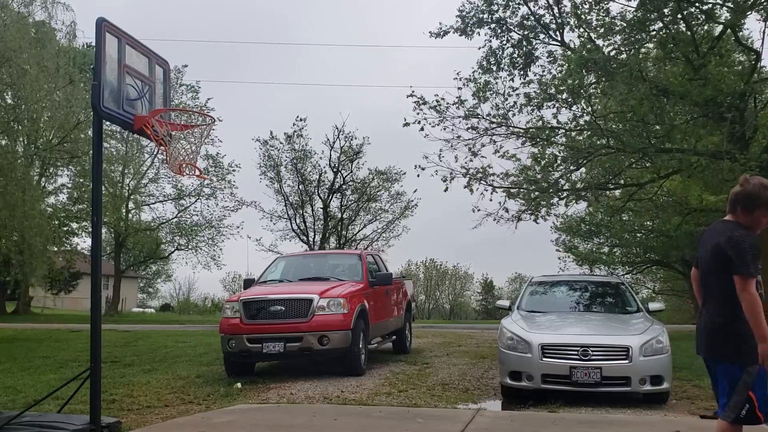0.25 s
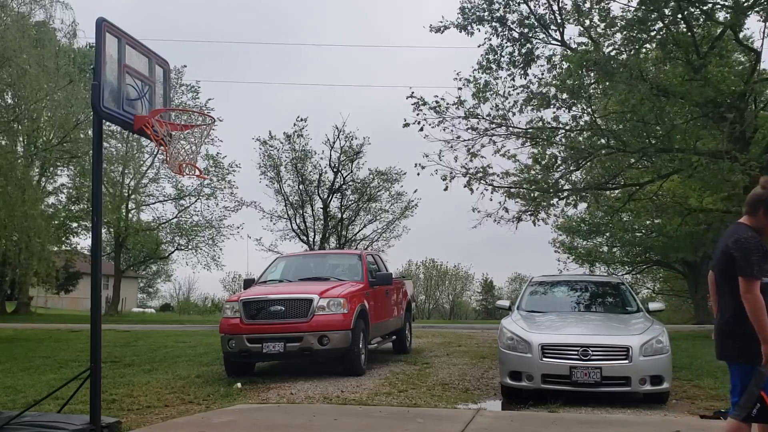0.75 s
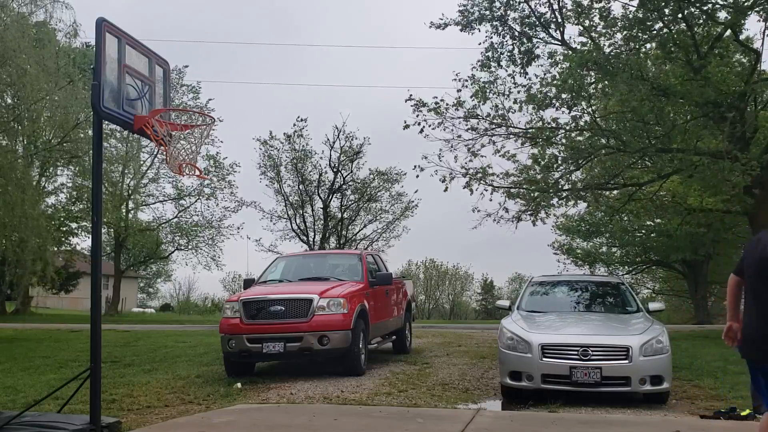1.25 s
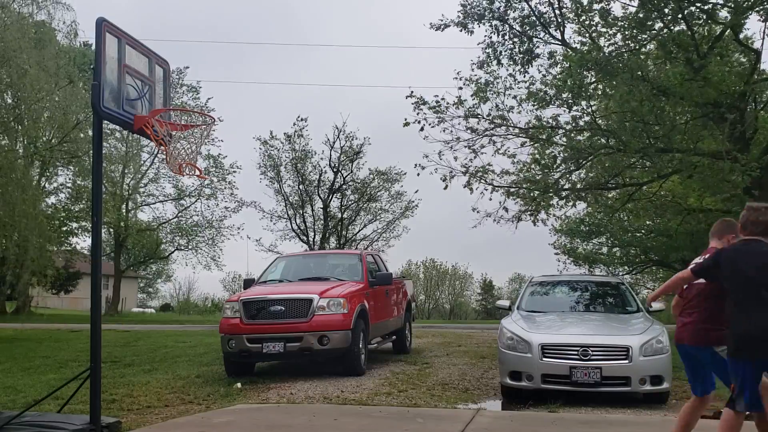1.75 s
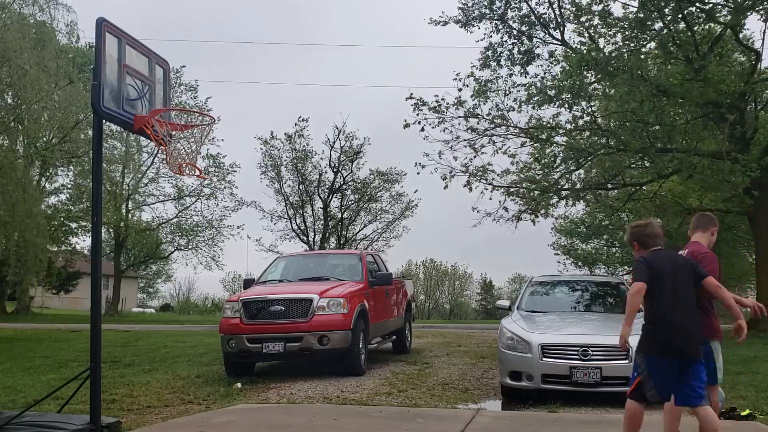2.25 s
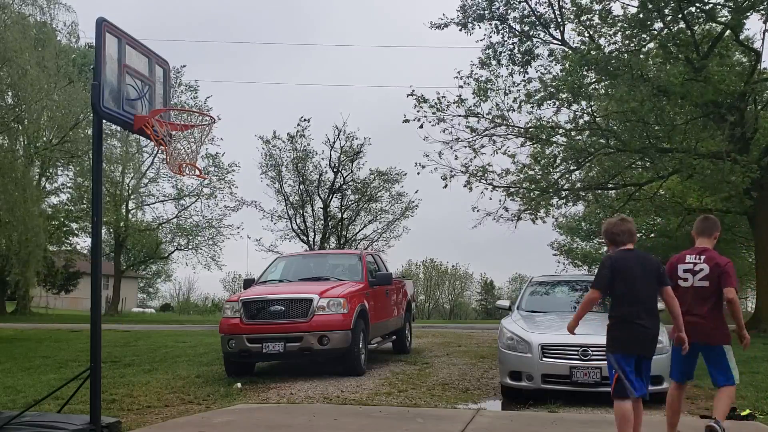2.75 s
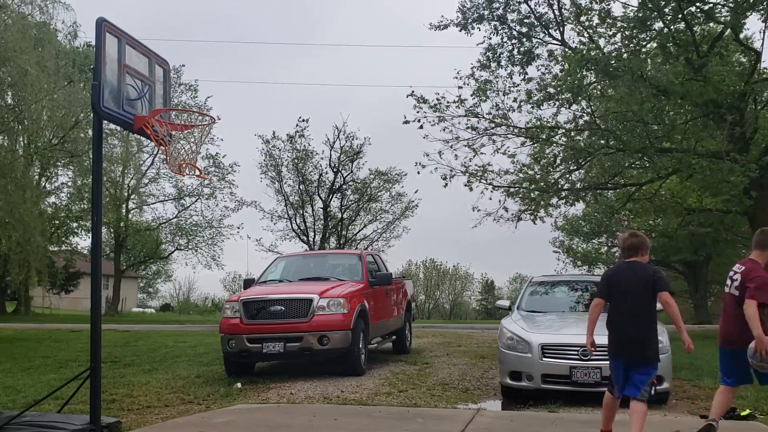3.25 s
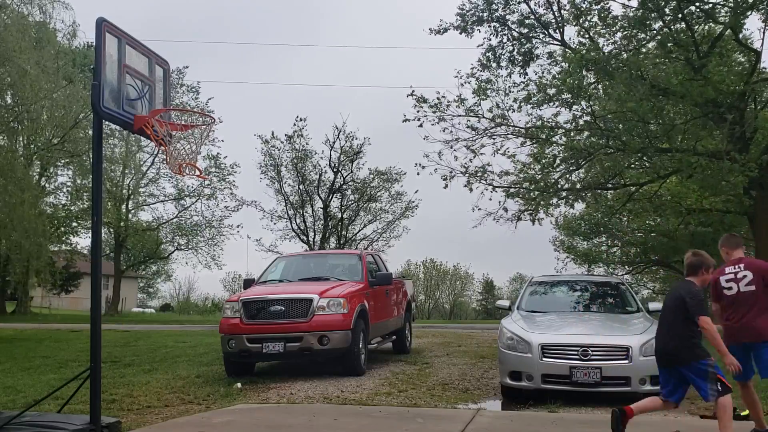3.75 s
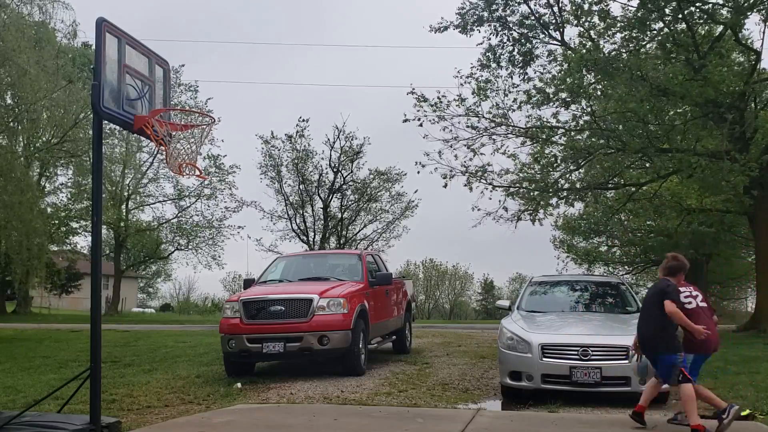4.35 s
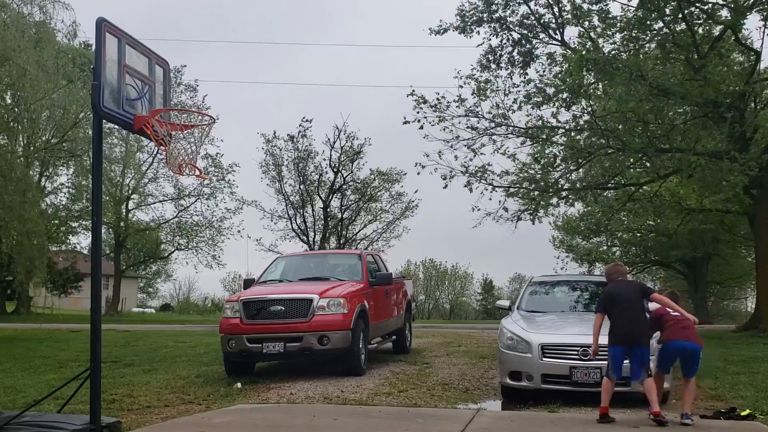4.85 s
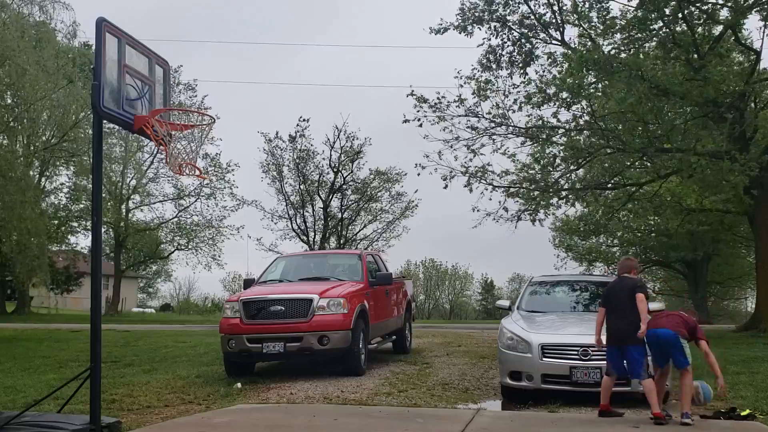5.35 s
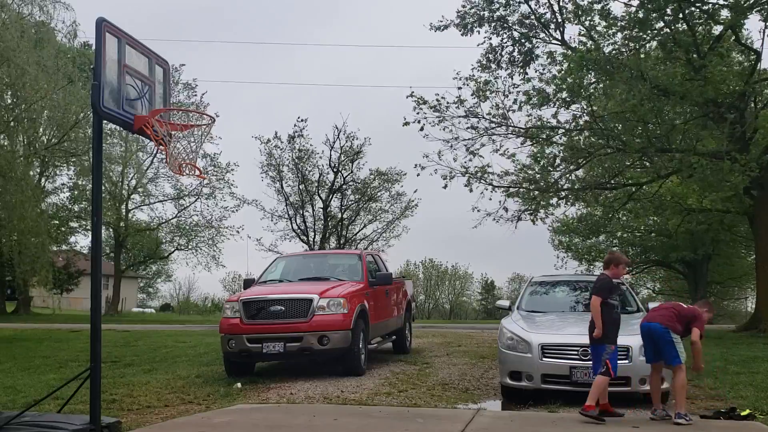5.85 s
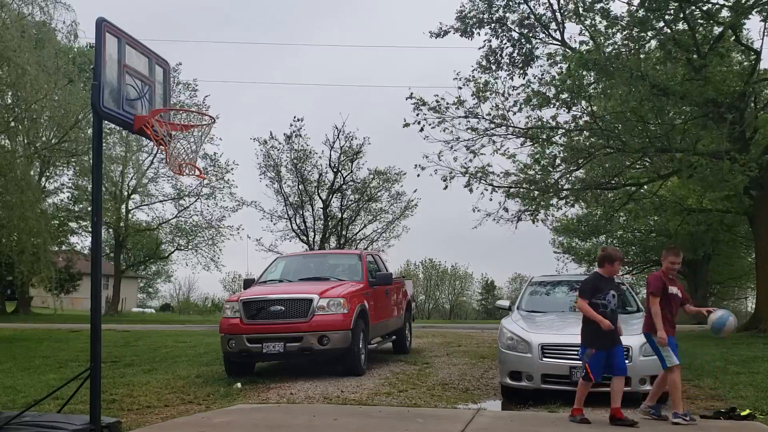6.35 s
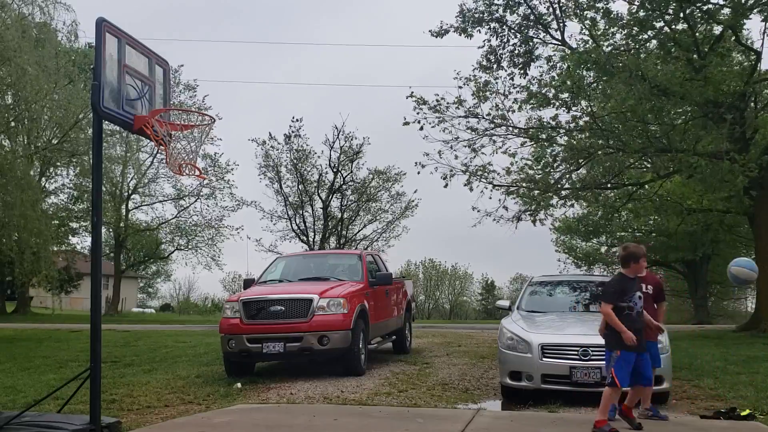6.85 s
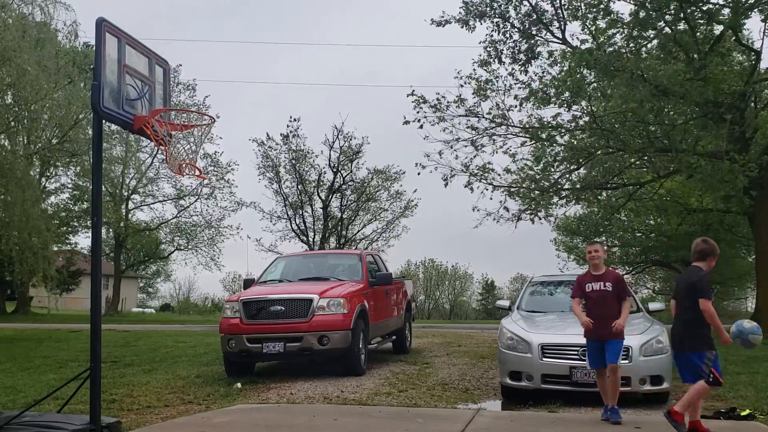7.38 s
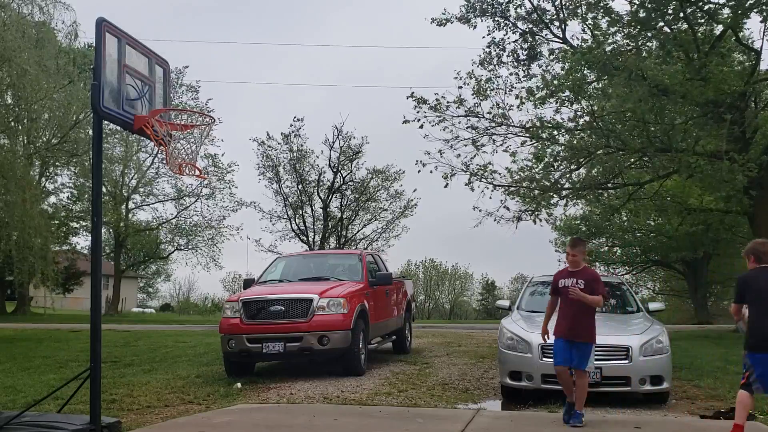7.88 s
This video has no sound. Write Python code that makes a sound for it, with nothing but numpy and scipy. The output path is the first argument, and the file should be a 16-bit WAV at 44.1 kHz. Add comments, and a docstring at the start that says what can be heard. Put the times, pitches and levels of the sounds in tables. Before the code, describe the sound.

On an open concrete driveway, a fixed stereo microphone a few metres away hears a basketball slightly to the right. Bounces land at about 0.0, 0.5, 1.0, 1.6, 2.4, 3.2 and 4.0 seconds, mostly firm: a low thump, dull slap, crack of grit and short hollow ring, with scattered yard echoes. Soft hand pats fall between them. Shoes scrape from 0.6 to 1.4, with lighter steps around 2 to 3.3 and busy gritty scuffling from 4.0 to 5.0. Dribbles weaken at 4.6, 5.1 and 5.5; a loud, sharp bounce follows at 6.6, with scrapes around it, then a moderate one at 7.6. A bird warbles until 1.2, swoops from 1.6 to 2.7, and repeats falling whistles from 3.8 to 4.9, then only faint chips until 6. Faint rumble and shuffling grow toward 8 seconds.

```python
"""A basketball is dribbled by two players on a concrete driveway, a little to the right.
Each bounce is a pressure thump, noise slap, grit crack and modal ring; hands and legs touch the ball softly.
Shoes step and scrape on grit (shaped noise and random grains); house, cars and trees scatter echoes.
Birds sing gliding whistles over a faint outdoor rumble that slowly grows (coloured noise)."""
import sys
import numpy as np
from scipy import signal
from scipy.fft import rfft, irfft
from scipy.io import wavfile
from scipy.ndimage import uniform_filter1d

SR = 44100
rng = np.random.default_rng(int(sys.argv[2]) if len(sys.argv) > 2 else 0)


def unload_wav(signal):
    """Save mono or channel-first audio to the path in sys.argv[1] as 16-bit WAV at rate SR, clipped to [-1, 1]."""
    wavfile.write(
        sys.argv[1],
        SR,
        np.round(np.clip(np.atleast_2d(signal).T, -1, 1) * 32767).astype(np.int16),
    )


N = 358091


def gain_of(db):
    """Decibels to gain."""
    return 10 ** (np.asarray(db) / 20)


def evened(x):
    """Scales to rms 1."""
    return x / np.sqrt(np.mean(x ** 2) + 1e-20)


def read(points, hz):
    """Reads a table on a log-frequency axis."""
    table_hz, value = np.transpose(points)
    return np.interp(np.log(hz + 1), np.log(table_hz + 1), value)


def add(mix, start_s, sound):
    """Mixes a sound in at a time."""
    part = mix[max(round(start_s * SR), 0):][:len(sound)]
    part += sound[:len(part)]


def bins(x):
    """Frequencies of a signal's spectrum, in Hz."""
    return np.fft.rfftfreq(x.shape[-1], 1 / SR)


def noise(colour, size):
    """Noise of rms 1 with a given spectrum."""
    white = rng.standard_normal(size)
    spectrum = rfft(white) * gain_of(read(colour, bins(white)))
    return evened(irfft(spectrum, size))


def clumps(size, depth_db, width_s):
    """An uneven gain of rms 1, as a sole catches and slips."""
    width = max(int(width_s * SR), 2)
    wander = evened(uniform_filter1d(rng.standard_normal(size), width))
    return evened(gain_of(depth_db * wander))


# left-right likeness of diffuse sound: freq_hz, likeness (0 to 1)
LIKENESS = [(100, 0.96), (300, 0.76), (700, 0.26), (1500, 0.12), (5000, 0.063)]


def diffuse(pair):
    """Two unrelated signals become alike in the bass, as at two close ports."""
    a, b = rfft(pair)
    same = np.clip(read(LIKENESS, bins(pair)), 0, 1)
    return irfft(np.array([a, same * a + np.sqrt(1 - same ** 2) * b]), pair.shape[-1])


# rumble colour ahead of the low-pass: freq_hz, density_db_per_hz
AIR_COLOUR = [(15, -43), (25, -12.5), (70, 2), (175, -3.5), (503, -14), (591, -22), (962, -11.5),
              (1400, -23), (1650, -21), (3520, -34.5), (6210, -26), (7510, -42), (9320, -22), (11900, -17),
              (16000, -66)]
# rumble level ahead of the low-pass: time_s, level_db
RUMBLE = [(0, -59), (5.3, -57), (7.1, -52.5), (8.1, -51)]


def air(hiss_db=-73.0, lowpass_hz=5000):
    """Far outdoor rumble that grows slowly, under a faint steady hiss."""
    level = gain_of(np.interp(np.arange(N) / SR, *np.transpose(RUMBLE)))
    far = np.array([noise(AIR_COLOUR, N), noise(AIR_COLOUR, N)])
    far = signal.sosfilt(signal.butter(1, lowpass_hz, fs=SR, output="sos"), far)
    hiss = np.array([noise(FIZZ, N), noise(FIZZ, N)])
    return diffuse(level * far + gain_of(hiss_db) * hiss)


# echo decay: freq_hz, t60_s
YARD_T60 = [(60, 0.36), (150, 0.62), (400, 0.64), (1000, 0.59), (3000, 0.53), (8000, 0.45), (15000, 0.5)]
# echo colour: freq_hz, gain_db
YARD_COLOUR = [(35, -15), (65, -5.5), (120, -10), (250, -5.5), (600, 1), (1100, -8.5), (2500, -2),
               (6000, -1), (12000, -3.5)]


def yard(x, first_s=0.0049, early_db=6, early_s=0.064, taps_per_s=5000):
    """Scattered echoes: strong early ones from house and cars, then a thin tail from the trees."""
    taps = rng.standard_normal((2, SR)) * (rng.random((2, SR)) < taps_per_s / SR)
    hz, t, z = signal.stft(taps, SR, nperseg=256)
    decay = gain_of(-60 * t / read(YARD_T60, hz)[:, None])
    tail = signal.istft(z * decay, SR, nperseg=256)[1]
    t = np.arange(tail.shape[1]) / SR
    onset = np.clip(t / first_s - 1, 0, 1)  # silent until first_s
    tail = tail * onset * (1 + gain_of(early_db) * np.exp(-t / early_s))
    tail = diffuse(tail / np.linalg.norm(tail, axis=1, keepdims=True))
    wet = signal.fftconvolve(x[None], tail, axes=1)[:, :N]
    return irfft(rfft(wet) * gain_of(read(YARD_COLOUR, bins(wet))), N)


def roaming(x, stride_s=0.773, count=4):
    """The echo pattern shifts as the players move: several patterns take turns."""
    place = np.arange(N) / SR / stride_s
    out = np.zeros((2, N))
    for k in range(count):
        offset = (place - k + count / 2) % count - count / 2
        out += yard(x * np.cos(np.pi / 2 * np.clip(offset, -1, 1)))
    return out


def from_right(x, left_lag_s=10.5 / SR):
    """Direct sound reaches the left port a little later."""
    left = irfft(rfft(x) * np.exp(-2j * np.pi * bins(x) * left_lag_s), N)
    return np.array([left, x])


def note(length_s, first_hz, last_hz, waver=0.01, edge_share=0.38, fade_db=-3.5):
    """A nearly pure whistle glides between pitches, swells in and out, and weakens along its length."""
    along = np.linspace(0, 1, int(length_s * SR))
    wander = evened(uniform_filter1d(rng.standard_normal(len(along)), size=120))
    pitch_hz = (first_hz + (last_hz - first_hz) * along) * (1 + waver * wander)
    level = gain_of(fade_db * along) * signal.windows.tukey(len(along), edge_share)
    return level * np.sin(2 * np.pi * np.cumsum(pitch_hz) / SR)


# syllables, before the song's pitch factor and level: after_s, length_s, first_hz, last_hz, note_db
WARBLE = [(0.004, 0.038, 2460, 2640, 0.5), (.04, .028, 2860, 2450, 5.5), (.09, .034, 2380, 1900, 0),
          (0.13, .05, 2180, 2270, 1.5)]
SWOOP = [(0, 0.0316, 2990, 2730, -1.5), (.02, .07, 2734, 3220, -6.5), (.1, .034, 2950, 1930, -2.5),
         (.143, 0.0328, 2190, 1950, -1.5)]
CHIP = [(0, .09, 3140, 2980, -1)]
WHISTLE = [(0, 0.052, 3970, 2790, -9.5), (0.031, 0.112, 2795, 2711, -2)]
# song: start_s, syllable, level_db, pitch_factor
SONG = [(0.202, WARBLE, -53, 0.97), (0.424, WARBLE, -46, 0.98), (0.791, WARBLE, -51, 1.01),
        (1.033, WARBLE, -43.5, 0.96), (1.6, SWOOP, -45.5, 0.96), (1.883, SWOOP, -47, 0.98),
        (2.189, SWOOP, -48, 1.004), (2.531, SWOOP, -45.5, 0.97), (3.557, CHIP, -63.5, 1.07),
        (3.809, WHISTLE, -48.5, 1.01), (4.045, WHISTLE, -43.5, 1.03), (4.278, WHISTLE, -45, 1.005),
        (4.515, WHISTLE, -43, 1.01), (4.758, WHISTLE, -45.5, 0.99), (5.079, CHIP, -57, 0.9),
        (5.25, CHIP, -76.5, 1.36), (5.98, CHIP, -64, .97)]


def bird():
    """Each syllable is sung several times, a little higher or lower."""
    out = np.zeros(N)
    for start_s, syllable, level_db, factor in SONG:
        for after_s, length_s, first_hz, last_hz, note_db in syllable:
            whistle = note(length_s, factor * first_hz, factor * last_hz)
            add(out, start_s + after_s, gain_of(level_db + note_db) * whistle)
    return out


# fine grit colour, also the air's hiss: freq_hz, density_db_per_hz
FIZZ = [(500, -20), (3000, -16), (6000, -10.5), (8000, -15.5), (9200, -0.5), (12500, 3), (14500, 1.5),
        (16000, -11.5)]
# coarse grit colour: freq_hz, density_db_per_hz
GRIT = [(100, -9), (400, 2), (620, -1.5), (1050, 13), (1400, 9.5), (2000, 5.5), (3000, 4.5), (4300, 2),
        (6500, 4.5), (8000, -8), (16000, 3.5)]


def friction(size, fizz_db, grit_db, grain_db=5, grains_per_s=650):
    """A sole on concrete: fine sand fizzes in uneven clumps, and coarse grit crunches grain by grain."""
    sizes = gain_of(grain_db * np.minimum(rng.exponential(1, size), 3)) * rng.choice([-1, 1], size)
    grains = sizes * (rng.random(size) < grains_per_s / SR)
    crunch = evened(irfft(rfft(grains) * gain_of(read(GRIT, bins(grains))), size))
    coarse = gain_of(grit_db) * (0.61 * crunch + 0.5 * noise(GRIT, size))
    sand = gain_of(fizz_db) * noise(FIZZ, size) * clumps(size, depth_db=2.5, width_s=0.00073)
    return clumps(size, depth_db=2.0, width_s=0.0048) * (sand + coarse)


def stroke(rise_s, fall_s, fizz_db, grit_db, bite=0.58, let_go=0.39):
    """A sole takes up weight and lifts off again."""
    t = np.arange(int((rise_s + fall_s) * SR)) / SR
    rise = np.minimum(t / rise_s, 1) ** bite
    fall = np.cos(np.pi / 2 * np.clip((t - rise_s) / fall_s, 0, 0.999)) ** let_go
    return rise * fall * friction(len(t), fizz_db, grit_db)


# soles sliding: start_s, length_s, fizz_db, coarse_grit_db
SCRAPES = [(.61, 0.2, -52.5, -54.5), (.73, 0.071, -36.5, -42), (0.942, 0.09, -42.5, -49),
           (1.173, 0.066, -43, -65), (1.325, 0.069, -41.5, -44.5), (2.293, 0.063, -39.5, -46),
           (2.624, 0.049, -43, -46), (3.259, .26, -48, -71), (3.697, 0.075, -53.5, -66),
           (4.144, 0.14, -41, -57.5), (4.264, 0.13, -42, -44), (4.438, 0.03, -43, -53),
           (4.515, 0.064, -44, -43), (4.644, 0.19, -50, -54), (4.962, .07, -46.5, -50),
           (6.413, 0.096, -42.5, -40.5), (6.786, 0.062, -40.5, -43.5), (8.009, 0.057, -44.5, -61)]
# soles landing: start_s, fizz_db, coarse_grit_db
STEPS = [(1.851, -51, -55.5), (2.17, -50, -75), (2.796, -45, -52.5), (3.056, -55.5, -74), (3.139, -51, -57),
         (3.337, -35, -50), (4.046, -44, -62), (4.075, -52, -46.5), (4.907, -53, -52.5), (5.394, -53, -57),
         (6.257, -45.5, -49.5), (7.173, -53, -47)]
# feet shuffling between the steps: time_s, level_db
SHUFFLE = [(0, -71.5), (1.9, -65.5), (2.1, -78), (5.3, -73), (7.1, -67), (7.6, -54), (8.1, -53.5)]


def shoes(uneven_db=2.0, uneven_s=0.05, shuffle_grit_db=-2, scrape_rise_share=0.21,
          step_rise_s=0.0031, step_fall_s=0.014):
    """Long slides and short steps over a light, uneven shuffling."""
    shuffle_db = np.interp(np.arange(N) / SR, *np.transpose(SHUFFLE))
    out = gain_of(shuffle_db) * friction(N, 0, shuffle_grit_db) * clumps(N, uneven_db, uneven_s)
    for start_s, length_s, fizz_db, grit_db in SCRAPES:
        rise_s = length_s * scrape_rise_share
        add(out, start_s, stroke(rise_s, length_s - rise_s, fizz_db, grit_db))
    for start_s, fizz_db, grit_db in STEPS:
        add(out, start_s, stroke(step_rise_s, step_fall_s, fizz_db, grit_db))
    return out


def burst(colour, t, decay_s):
    """A sudden puff of coloured noise that dies away, of steady energy from blow to blow."""
    fade = np.exp(-t / decay_s)
    return evened(noise(colour, len(t)) * fade) * np.sqrt(np.mean(fade ** 2))


def click(colour, size=2048):
    """The sharpest (minimum-phase) click that has a given spectrum, with peak 1."""
    log_gain = np.log(gain_of(read(colour, abs(np.fft.fftfreq(size, 1 / SR)))))
    pulse = np.fft.ifft(np.exp(np.conj(signal.hilbert(log_gain)))).real[:size // 2]
    return pulse / abs(pulse).max()


# nominal modes of the shell (low) and of the air inside (high): mode_hz, level_db, t60_s
BALL_MODES = [(180, 7, .12), (226.6, 2, 0.096), (262.6, -3, 0.16), (391.8, -8.5, 0.14), (594, -32, 0.28),
              (781, -8, 0.042), (860, -14, 0.064), (1016, -2, 0.078), (1183, -11.5, 0.05),
              (1623, -12, 0.15), (1783, -10.5, 0.096), (2086, -8, 0.074), (2380, -42, .16)]


def ring(t, low_hz, high_hz, spot_db=3.0):
    """Ball modes: a soft blow leaves out the high ones, a holding hand the low; each spot differs."""
    out = np.zeros(len(t))
    for mode_hz, level_db, t60_s in BALL_MODES:
        decay = gain_of(level_db + spot_db * rng.uniform(-0.93, 1) - 60 * t / t60_s)
        band_loss = np.hypot(1, (mode_hz / high_hz) ** 3 + (low_hz / mode_hz) ** 3)
        cycles = mode_hz * rng.uniform(0.94, 1.025) * t + rng.random()
        out += decay / band_loss * np.sin(2 * np.pi * cycles)
    return out


# slap colour: freq_hz, density_db_per_hz
SLAP = [(100, 15.5), (220, -15.5), (400, 2), (600, -11), (880, 2), (1170, 6.5), (1330, -12.5), (1800, -4.5),
        (3000, -28), (5000, -25), (16000, -30.5)]
# soft knocks, most of them hands and legs on the ball: start_s, level_db, contact_s, low_hz, high_hz
TOUCHES = [(1.048, -26.5, 0.015, 340.6, 475), (1.414, -24, 0.0086, 363, 464), (3.34, -38, 0.021, 396, 1290),
           (3.756, -42, .01, 344, 1100), (4.075, -30, 0.0027, 436, 2500), (4.912, -26.5, 0.053, 136, 520),
           (5.021, -35.5, 0.019, 70, 141), (5.769, -41.5, 0.016, 300, 2010), (7.879, -40, 0.051, 300, 895),
           (8.029, -42, 0.014, 800, 1440)]


def touches(pad_db=-1, ring_db=-4):
    """Soft blows swell the ball's ring over their contact time, with a dull pat of skin or cloth."""
    out, t = np.zeros(N), np.arange(SR // 2) / SR
    for start_s, level_db, contact_s, low_hz, high_hz in TOUCHES:
        swell = 1 - np.exp(-3 * t / contact_s)
        edges_hz = [min(low_hz, high_hz * 0.9), high_hz]
        band = signal.butter(2, edges_hz, "bandpass", fs=SR, output="sos")
        pat = signal.sosfilt(band, burst(SLAP, t, contact_s))
        ringing = swell * ring(t, low_hz, high_hz)
        add(out, start_s, gain_of(level_db) * (gain_of(ring_db) * ringing + gain_of(pad_db) * pat))
    return out


# grit crack colour: freq_hz, density_db_per_hz
CRACK = [(300, -57), (1000, -8.5), (3200, 9.5), (5000, 1.5), (7000, 6), (8000, -49.5), (9000, 7.5),
         (12500, 6), (16000, -13)]
# ball on concrete: start_s, thump_db, thump_hz, slap_db, crack_db
BOUNCES = [(0.0168, -23, 113, -28.5, -36), (0.543, -26.5, 116, -30.5, -66),
           (1.0173, -17, 97.4, -26.5, -26.5), (1.5666, -16, 113, -24, -31), (2.386, -15, 111.6, -23, -31),
           (3.1774, -14, 99.6, -21.5, -24.5), (4.0159, -17, 116, -23.5, -35),
           (4.5572, -22.5, 114, -25.5, -27), (5.1, -29, 102, -31, -61), (5.528, -34.5, 96, -37.5, -46.5),
           (6.5815, -14.5, 103, -18.5, -25), (7.633, -20, 105, -23, -31.5)]
# a firm bounce, and the ring that goes with it
FIRM_DB, FIRM_HZ, FIRM_RING_DB = -14, 107.4, -29
RING_DB_PER_THUMP_DB = 0.87
RING_DB_PER_HZ = 0.24  # a quicker contact rings the ball more


def bounces(deepest_s=0.00854, squash_s=0.0059, slap_s=0.01, release_s=0.0115, release_db=-7,
            crack_s=0.0012, snap_db=12.5, boom_hz=56, boom_db=-16, boom_t60_s=0.49):
    """The ball snaps onto grit, squashes and springs back, then rings; a low boom hangs on."""
    out, t = np.zeros(N), np.arange(SR // 2) / SR
    for start_s, thump_db, thump_hz, slap_db, crack_db in BOUNCES:
        ring_db = FIRM_RING_DB + RING_DB_PER_THUMP_DB * (thump_db - FIRM_DB)
        ring_db += RING_DB_PER_HZ * (thump_hz - FIRM_HZ)
        # air is pushed out, drawn in and pushed out again during the contact
        from_deepest_s = t - deepest_s
        squash = np.exp(-0.5 * abs(from_deepest_s / squash_s) ** 3)
        thump = -np.cos(2 * np.pi * thump_hz * from_deepest_s) * squash
        boom = gain_of(boom_db - 60 * t / boom_t60_s) * np.cos(2 * np.pi * boom_hz * (t - 0.012))
        boom *= 1 - np.exp(-t / 0.0011)
        body = gain_of(thump_db) * (thump + boom) + gain_of(ring_db) * ring(t, 94, 2600)
        add(out, start_s, body * (1 - np.exp(-t / 0.00085)))
        add(out, start_s, gain_of(slap_db) * burst(SLAP, t, slap_s))
        # the dent pops back out
        add(out, start_s + release_s, gain_of(slap_db + release_db) * burst(SLAP, t, slap_s))
        add(out, start_s, -gain_of(crack_db + snap_db) * click(CRACK))
        crackle = burst(CRACK, t, crack_s) + 0.41 * burst(CRACK, t, 0.0069)
        add(out, start_s, gain_of(crack_db) * crackle)
    return out


def scene(ball_echo_db=-1.5, feet_echo_db=2.5, song_echo_db=-6):
    """Ball, shoes and birds, each direct and echoed, over the outdoor air."""
    ball, feet, song = bounces() + touches(), shoes(), bird()
    echoed = gain_of(ball_echo_db) * ball + gain_of(feet_echo_db) * feet + gain_of(song_echo_db) * song
    return from_right(ball + feet + song) + roaming(echoed) + air()


# port colours: freq_hz, left_minus_right_db
PORTS = [(100, 6), (300, 4.5), (560, 3), (1000, 0.5), (2300, 8.5), (4200, -3), (8000, -4.5), (14000, -4.5)]


def record(dry, low_cut_hz=43, edge_hz=16250):
    """The microphone drops the deepest bass and each port has its own colour; then the band limit."""
    hz = bins(dry)
    tilt_db = read(PORTS, hz) / 2
    bass = 1 / np.hypot(1, (low_cut_hz / (hz + 1)) ** 4)
    heard = irfft(rfft(dry) * bass * gain_of([tilt_db, -tilt_db]), N)
    band_limit = signal.firwin(511, edge_hz, window=("kaiser", 9), fs=SR)
    return signal.oaconvolve(heard, band_limit[None], "same")


dry = scene()
out = record(dry)
unload_wav(out)
```